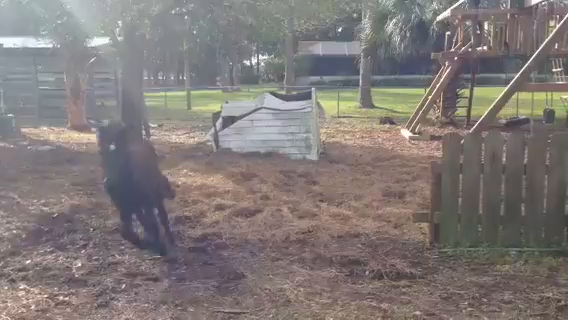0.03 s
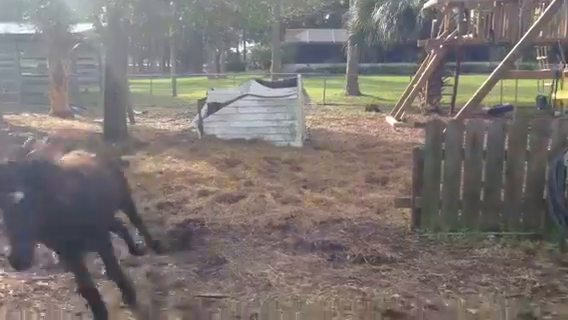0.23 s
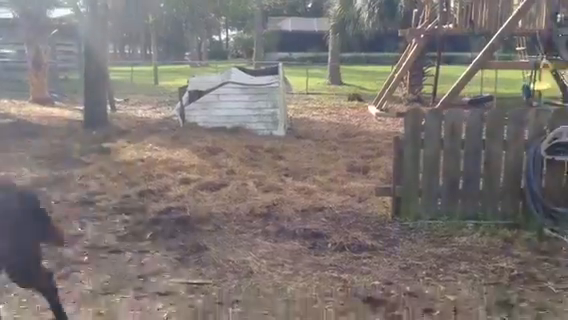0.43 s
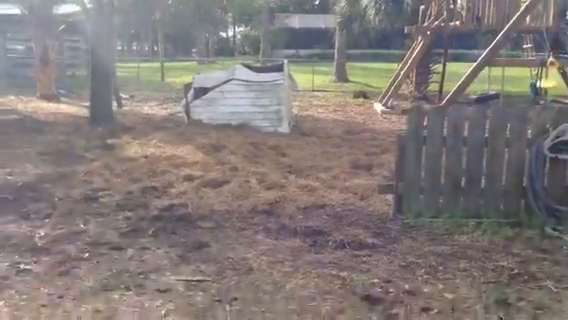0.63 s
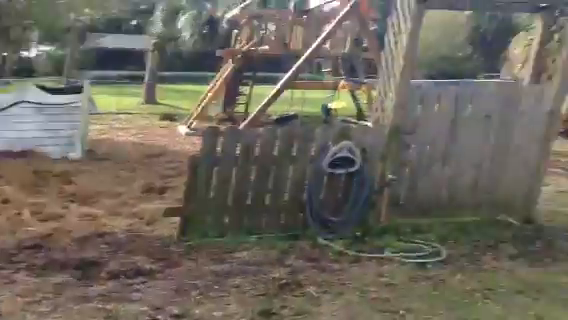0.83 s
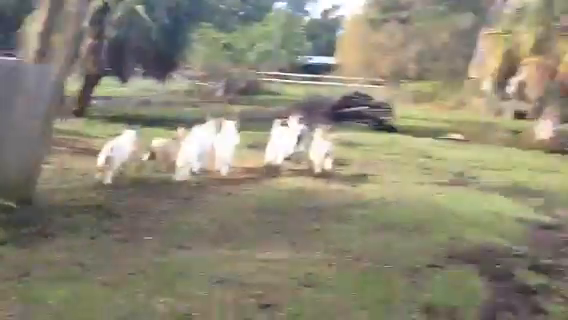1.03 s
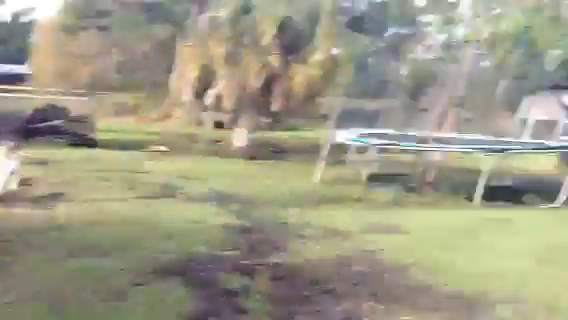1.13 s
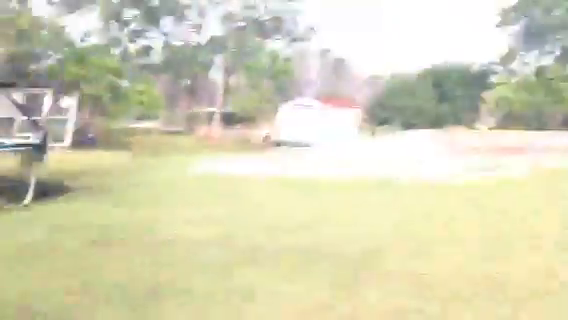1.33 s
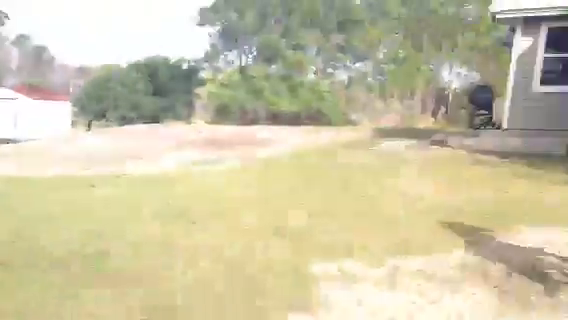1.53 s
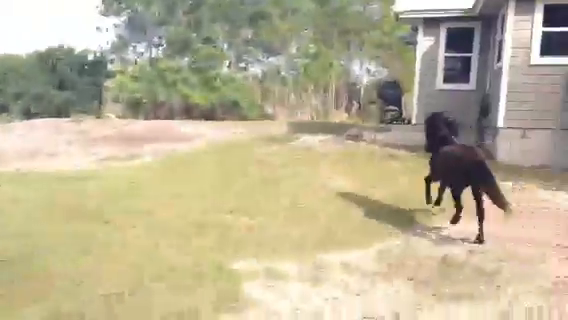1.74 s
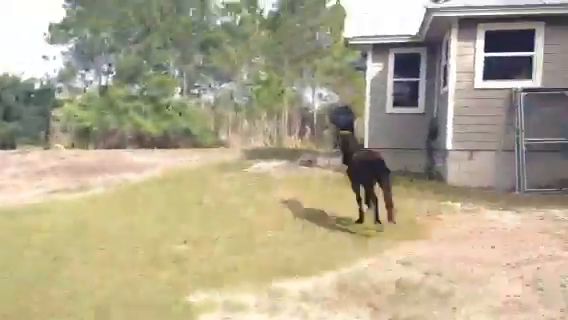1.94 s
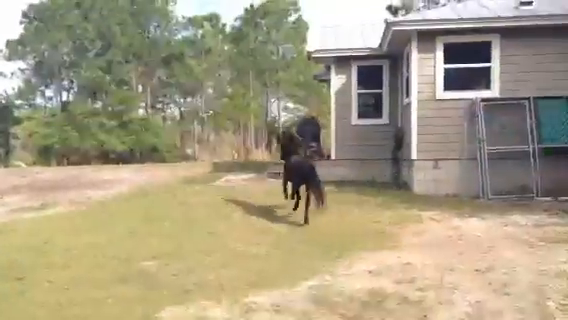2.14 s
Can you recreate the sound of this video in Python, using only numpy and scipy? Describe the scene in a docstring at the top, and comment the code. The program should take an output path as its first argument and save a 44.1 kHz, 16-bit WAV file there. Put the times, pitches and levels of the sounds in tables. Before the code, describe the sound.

A small horse gallops past close to the microphone, its hooves thudding on soft dirt while dry leaves crunch and twigs snap. It then runs off over grass with less rustling, in a quiet open yard.

```python
"""A small horse galloping past.

The horse crosses soft dirt and leaf litter, then runs away over grass. Each impact drives a damped
oscillation of the soil and crushes the litter; the nearest also rings the hoof. Twigs snap and
kicked-up debris rustles. Behind lie the faint air of an open yard, a distant drone and a little wind."""
import sys
import numpy as np
from scipy import signal
from scipy.fft import rfft, irfft
from scipy.io import wavfile

SR = 44100
rng = np.random.default_rng(int(sys.argv[2]) if len(sys.argv) > 2 else 0)


def wav_out(sig):
    """Save sig, one row per channel (or a flat mono array), as 16-bit PCM at SR to the path in sys.argv[1]."""
    wavfile.write(sys.argv[1], SR, np.round(np.clip(np.atleast_2d(sig).T, -1, 1) * 32767).astype(np.int16))


N = 97020
T = np.arange(N) / SR

# Spectrum of the outdoor air (frequency [Hz], relative density [dB])
AIR_SPECTRUM = [(15, -78), (25, -49), (45, -5), (64, -29.5), (99, -2), (133, -1.5), (178, 1), (227, -6),
                (274, -5), (399, -8.5), (500, -18), (700, -16.5), (1600, -22), (2900, -29.5), (14300, -35),
                (15500, -35)]
# Low wind on the microphone (time [s], level before the high-pass [dB])
WIND_LEVELS = [(.08, -58.5), (.5, -57), (.9, -55.5), (1.12, -54), (1.3, -72), (2.2, -68)]
# Rustle of kicked-up litter (time [s], level [dB])
RUSTLE_LEVELS = [(.08, -60.5), (.24, -57), (.4, -59), (.53, -56), (.66, -60), (.82, -58), (1., -61.5),
                 (1.25, -67), (1.5, -65), (2.2, -78.5)]
# Spectrum of the rustle (frequency [Hz], relative density [dB])
RUSTLE_SPECTRUM = [(100, -7), (200, -8.5), (420, 4), (700, 1.5), (1300, 1), (2250, -5), (2800, -11.5),
                   (6000, -13.5), (10000, -17.5), (15000, -21)]
# Twigs breaking (time [s], level [dB], frequency [Hz], decay [s], splintering [dB re the ring])
TWIG_SNAPS = [(0.1917, -31, 1450, 0.00037, -23), (.331, -33.5, 4820, 0.00078, -6),
              (0.435, -49, 6000, .0003, 2), (0.4899, -41.5, 4170, 0.00025, -6),
              (0.5935, -39.5, 3720, 0.00059, -2), (1.542, -47.5, 4350, 0.0009, -3)]
# Litter crushed under a hoof (time [s], level [dB], decay [s], treble corner [Hz])
LITTER_CRUNCHES = [(.1455, -45.5, 0.0034, 10300), (0.184, -54.5, 0.03, 9000), (0.1906, -51, 0.011, 1100),
                   (0.257, -55, 0.036, 8250), (.322, -59, 0.0034, 1510), (0.4817, -49.5, 0.0094, 6740),
                   (0.541, -56, 0.015, 4900), (.565, -54, 0.002, 3000), (0.677, -45.5, 0.0054, 8700),
                   (0.7523, -45, 0.0036, 2280), (.812, -64, 0.0037, 2000), (0.8392, -50, 0.0038, 1750),
                   (0.9652, -52, 0.0033, 2460), (1.016, -55, 0.0071, 1200), (1.052, -53.5, 0.0019, 1760),
                   (1.3795, -60.5, 0.0066, 2000), (1.451, -64, 0.0051, 2000), (1.4778, -45, 0.0018, 13900),
                   (1.557, -54.5, 0.0071, 3000), (1.806, -55.5, 0.0023, 2600), (1.893, -58, 0.01, 3940),
                   (1.9042, -55, 0.0023, 5000), (1.992, -61, 0.0064, 4000)]
# Modes of the hoof (frequency [Hz], relative level [dB], time to fall 60 dB [s])
HOOF_MODES = [(378, 2, 0.037), (463, -6, 0.055), (657, -1.5, 0.031), (753, -20.5, 0.077), (1240, 7, 0.0062),
              (1444, -22, 0.028), (1860, -7.5, 0.028), (2126, -3.5, 0.02), (2630, -15, 0.023),
              (4050, -16.5, 0.021), (4770, -18.5, 0.021)]
# Blows on the soil (time [s], level [dB], frequency [Hz], decay [cycles], clods [dB re the blow])
HOOF_BLOWS = [(0.15, -40, 190, 0.58, -5.5), (.158, -35, 137, 1.47, -41), (0.185, -47, 169, 0.88, -9),
              (0.193, -45, 201, 0.48, -14), (0.207, -38, 142, 0.78, -35), (0.2613, -33, 203, 1.34, -28),
              (.277, -31.5, 159, 0.6, -48), (0.3243, -29.5, 216, 0.62, -35), (0.339, -38, 188, .8, -29),
              (.361, -41.5, 170, 1.2, -24), (0.4854, -35, 147, 0.95, -21), (0.501, -37, 139, 1.15, -18),
              (0.5445, -38.5, 187, 1.7, -28), (0.6816, -29.5, 149, 1.4, -23.5),
              (0.6852, -27.5, 454, 0.33, -37), (0.7554, -29.5, 183, 0.37, -13),
              (0.773, -41, 140, 0.48, -35), (0.9644, -21, 167, 0.4, -23.5), (.982, -33.5, 119, 0.8, -16),
              (1.022, -35.5, 184, 0.73, -11.5), (1.031, -31.5, 131, 0.43, -20),
              (1.079, -33, 115, 0.24, -20.5), (1.092, -33.5, 118, 0.31, -14.5),
              (1.148, -39.5, 145, 0.24, -10), (1.162, -35.5, 115, 0.33, -19),
              (1.3814, -32.5, 206, 0.73, -18), (1.397, -37.5, 168, 1, -21), (1.453, -39, 273, 1.1, -8.5),
              (1.4794, -30.5, 194, 1.23, -17), (1.5599, -38.5, 343, 1.3, -13),
              (1.8062, -27, 285, 0.85, -30), (1.850, -44, 237, 1.3, -19), (1.892, -39.5, 332, 3.6, -15.5),
              (1.9054, -33, 167, 0.39, -27), (1.9927, -35.5, 273, 0.8, -34), (2.123, -61, 205, 0.31, -26)]

AIR_DB, DRONE_DB = -56, -59
CRUNCH_ATTACK_S, CRUNCH_LOW_HZ, CRUNCH_TOP_HZ = 0.0011, 530, 10650
SCATTER_DB, SCATTER_S = -24, 0.061
KNOCK_AT_S, KNOCK_RISE_S, KNOCK_DB, GRIT_DB = .9626, 0.00031, -29, -35.5
PUSH_CYCLES, SHUDDER_DB, SHUDDER_S = 0.46, -22, 0.047


def undb(db):
    """Amplitude ratio of a level in decibels."""
    return 10 ** (np.asarray(db) / 20)


def unit(x):
    """Normalisation to an rms of 1."""
    return x / np.std(x)


def curve(rows):
    """Gain over time, interpolated between (time [s], level [dB]) points."""
    return undb(np.interp(T, *np.array(rows).T))


def cut(x, hz, kind, order=2):
    """Butterworth low-pass or high-pass filtering."""
    return signal.sosfilt(signal.butter(order, hz, kind, fs=SR, output="sos"), x)


def ring(x, hz, width_hz):
    """Two equal resonators in cascade pass a band with steep skirts."""
    b, a = signal.iirpeak(hz, hz / width_hz, fs=SR)
    return signal.lfilter(b, a, signal.lfilter(b, a, x))


def colour(x, points):
    """Spectral shaping by (frequency [Hz], level [dB]) points, normalised to an rms of 1."""
    hz, db = np.array(points).T
    bin_hz = np.maximum(np.arange(N // 2 + 1) * SR / N, 1)
    gain = undb(np.interp(np.log(bin_hz), np.log(hz), db))
    return unit(irfft(rfft(x) * gain, N))


def burst(at, attack_s, decay_s):
    """Envelope of a transient: Gaussian rise to the peak, then exponential decay."""
    age = T - at
    return np.exp(-(np.minimum(age, 0) / attack_s) ** 2 - np.minimum(np.maximum(age, 0) / decay_s, 20))


def grains(per_s=10000, spread_db=6):
    """Shot noise: independent impulses of random size and sign."""
    size = undb(spread_db * np.minimum(rng.exponential(size=N), 4))
    return (rng.random(N) < per_s / SR) * size * rng.choice([-1, 1], N)


def yard():
    """Filtered noise: a broad spectrum for the air, low bands for the far drone and the wind."""
    air = undb(AIR_DB) * colour(rng.standard_normal(N), AIR_SPECTRUM)
    drone = undb(DRONE_DB) * unit(ring(rng.standard_normal(N), hz=87, width_hz=20))
    wind = curve(WIND_LEVELS) * unit(ring(rng.standard_normal(N), hz=67, width_hz=89))
    return air + drone + cut(wind, 57, "high", order=4)


def rustle():
    """Litter stirred by the legs makes shot noise, which fades as the horse reaches the grass."""
    return colour(grains(per_s=6000, spread_db=2.5), RUSTLE_SPECTRUM) * curve(RUSTLE_LEVELS)


def twigs():
    """Brittle fracture: each twig gives a heavily damped ring and a bright burst of splintering."""
    out = np.zeros(N)
    for at, db, hz, decay_s, splinter_db in TWIG_SNAPS:
        wood = np.cos(2 * np.pi * hz * (T - at))
        splinter = undb(splinter_db) * cut(rng.standard_normal(N), hz, "high")
        out += undb(db) * (wood + splinter) * burst(at, attack_s=0.000067, decay_s=decay_s)
    return cut(out, CRUNCH_TOP_HZ, "low")


def litter():
    """Crackling noise: crushed dry leaves emit dense impulses, and falling crumbs add a faint tail."""
    out = np.zeros(N)
    for at, db, decay_s, corner_hz in LITTER_CRUNCHES:
        crackle = cut(grains(), corner_hz, "low", order=1)
        crackle = unit(cut(crackle, CRUNCH_LOW_HZ, "high"))
        crush = burst(at, CRUNCH_ATTACK_S, decay_s)
        scatter = undb(SCATTER_DB) * burst(at, CRUNCH_ATTACK_S, SCATTER_S)
        out += undb(db) * crackle * (crush + scatter)
    return cut(out, CRUNCH_TOP_HZ, "low")


def hoof_knock():
    """Modal vibration: the nearest footfall excites the hoof's damped modes and grinds some grit."""
    age = np.maximum(T - KNOCK_AT_S, 0)
    modes = sum(undb(db - 60 * age / t60) * np.sin(2 * np.pi * hz * age) for hz, db, t60 in HOOF_MODES)
    onset = 1 - np.exp(-(age / KNOCK_RISE_S) ** 2)
    knock = cut(modes * onset, 5370, "low", order=6)
    grit = cut(grains(), 2020, "low", order=8)
    grit = unit(cut(grit, CRUNCH_LOW_HZ, "high"))
    grit *= burst(KNOCK_AT_S + KNOCK_RISE_S, CRUNCH_ATTACK_S, decay_s=0.0019)
    return undb(KNOCK_DB) * knock + undb(GRIT_DB) * grit


def hoof_thuds():
    """Damped oscillation: each blow crumbles clods and pushes the soil, which rebounds and shudders."""
    thuds, shudder_power, crumbling = np.zeros((3, N))
    for at, db, hz, cycles, clod_db in HOOF_BLOWS:
        thuds -= undb(db) * burst(at, PUSH_CYCLES / hz, cycles / hz) * np.sin(2 * np.pi * hz * (T - at))
        # Incoherent vibrations add in power.
        shudder_power += (undb(db) * burst(at + 1 / hz, 1 / hz, SHUDDER_S)) ** 2
        # Clods break during the push, a quarter cycle early.
        crumbling += undb(db + clod_db) * burst(at - .25 / hz, CRUNCH_ATTACK_S, decay_s=0.0026)
    soil = unit(ring(rng.standard_normal(N), hz=155, width_hz=212))
    clods = unit(ring(grains(), hz=713, width_hz=920))
    return thuds + undb(SHUDDER_DB) * np.sqrt(shudder_power) * soil + crumbling * clods


def scene():
    """Superposition: the sounds of the horse and the yard add in one channel."""
    return (hoof_thuds() + hoof_knock() + litter() + twigs() + rustle() + yard())[None]


def record(dry):
    """Gating and band limiting: the sound enters after a brief silence and loses its highest treble."""
    start_s, fade_s, top_hz = .083, .003, 15600
    gate = np.clip((T - start_s) / fade_s, 0, 1)
    return signal.sosfilt(signal.ellip(10, .2, 70, top_hz, fs=SR, output="sos"), dry * gate)


dry = scene()
out = record(dry)
wav_out(out)
```